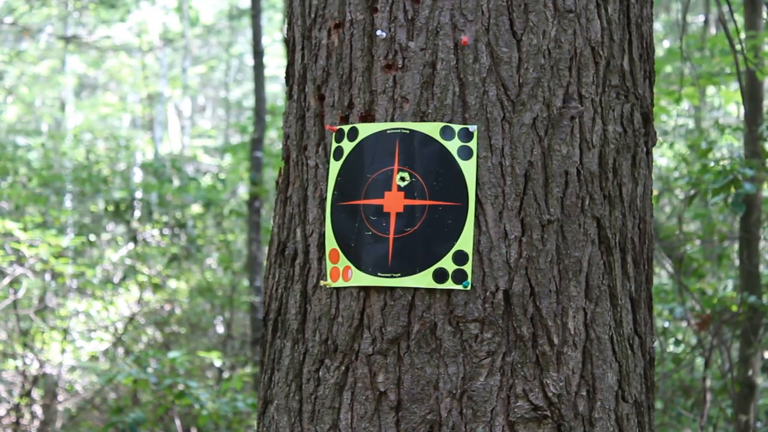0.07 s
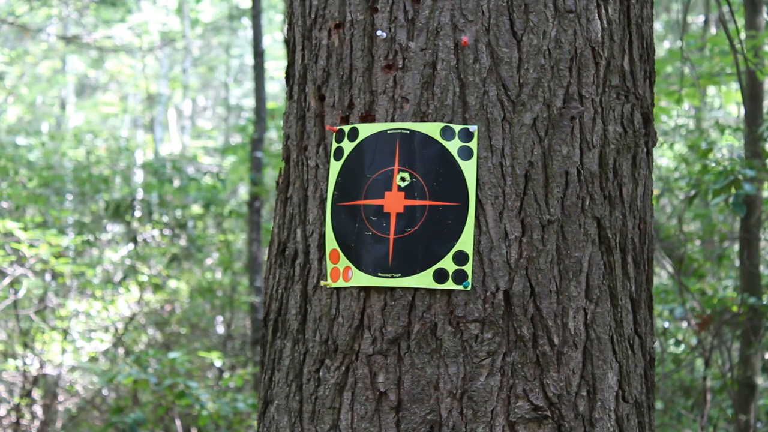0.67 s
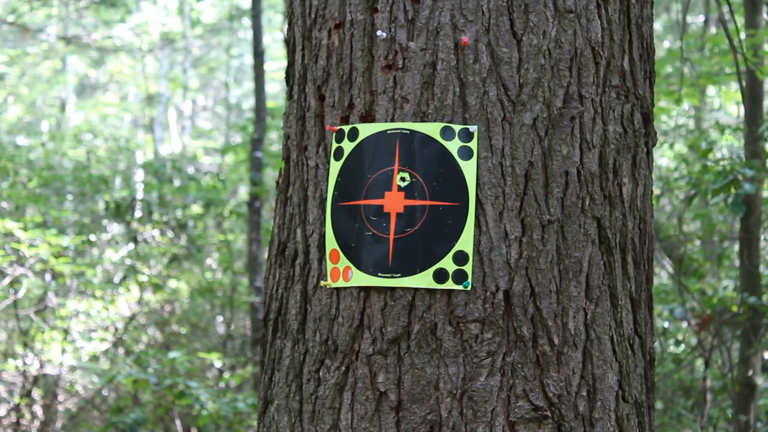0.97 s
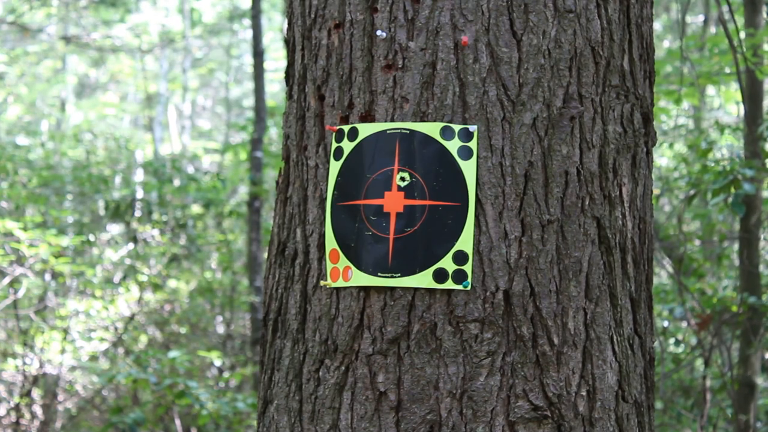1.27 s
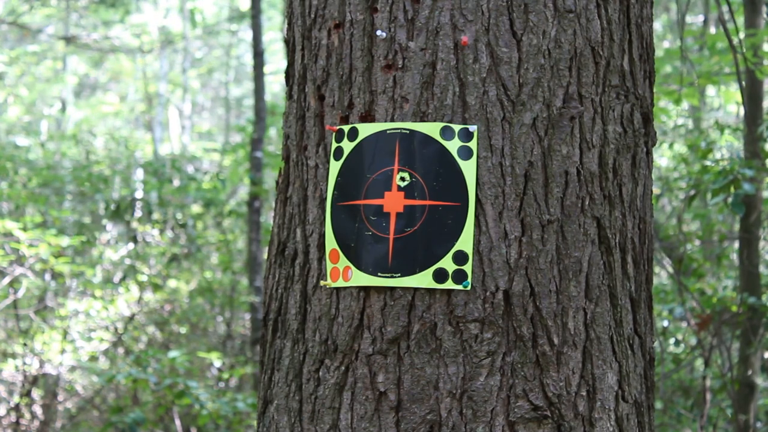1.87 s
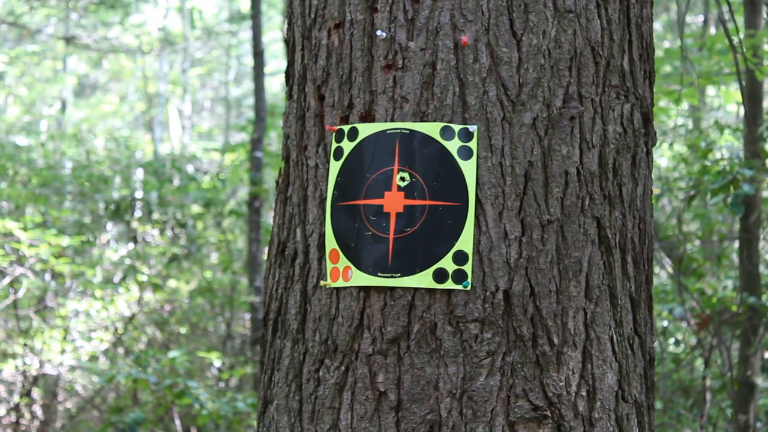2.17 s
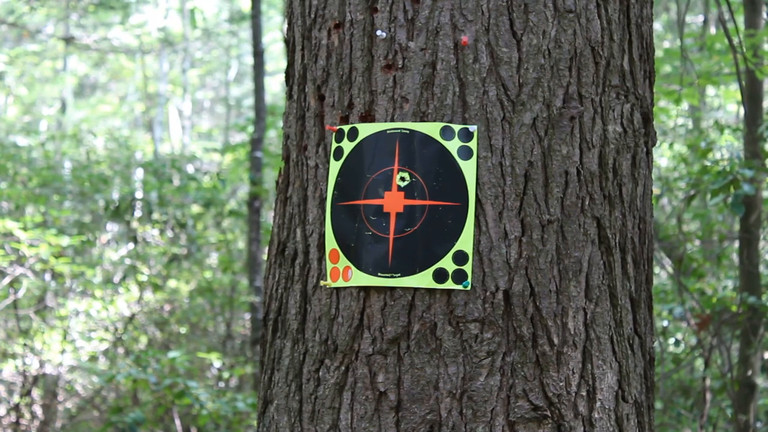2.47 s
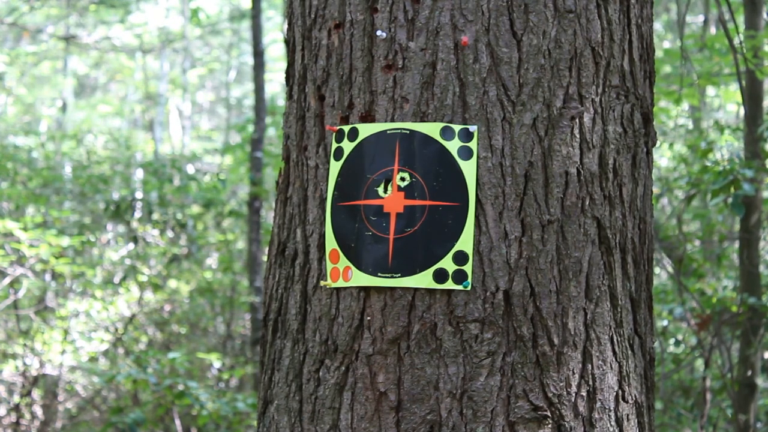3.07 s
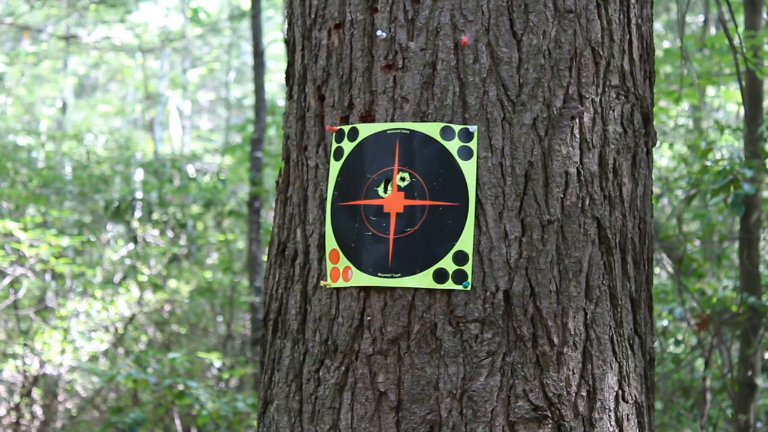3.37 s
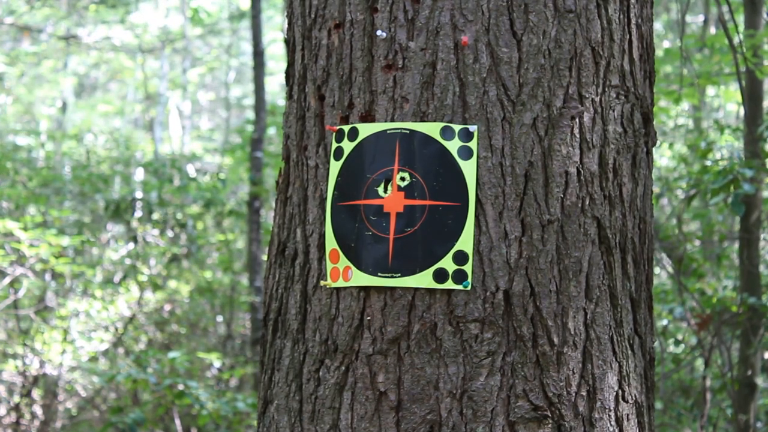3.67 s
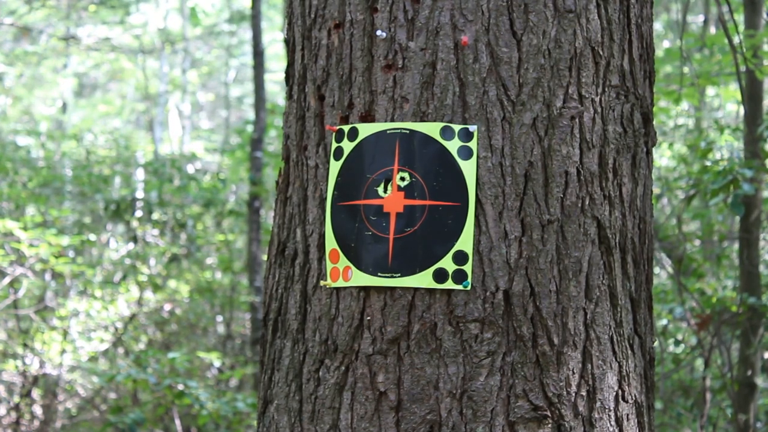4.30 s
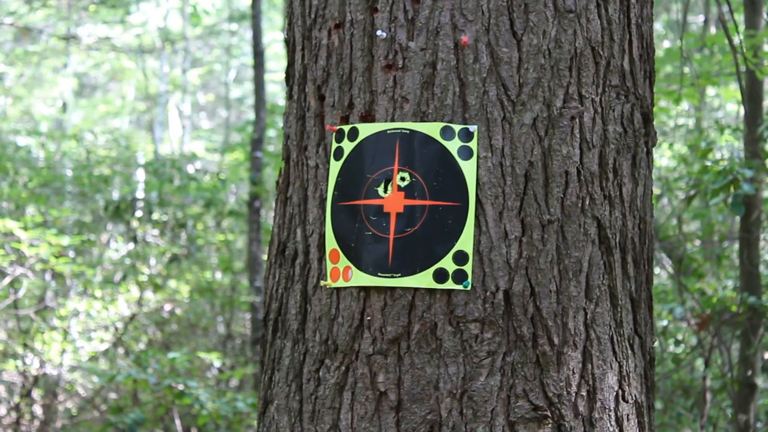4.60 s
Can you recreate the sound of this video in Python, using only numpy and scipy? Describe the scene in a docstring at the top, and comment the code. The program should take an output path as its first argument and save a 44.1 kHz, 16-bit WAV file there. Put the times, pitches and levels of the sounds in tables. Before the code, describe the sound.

For the first two seconds or so, the woods are quiet, with a faint hiss of foliage and soft, low puffs of breeze bumping the microphone. At about 2.4 seconds a flintlock pistol's flint strikes steel with a small ringing click and a very brief fizz of powder. At 2.5 seconds the pistol fires once, a loud, sharp blast with a low boom that overloads the microphone and makes the level dip. A long echo returns from the trees, swelling at around 2.9 seconds and then growing duller as it fades over the next second or more. Bits of bark tick brightly into dry leaves at about 3.3 seconds, and again very faintly near 3.7. At around 4.8 seconds a foot shifts with a soft, dull thud and a slight crinkle of leaf litter.

```python
"""A breeze stirs the woods and bumps the microphone. A flintlock pistol fires once: the flint strikes
and rings the steel, the priming fizzes, then the charge sends out a shock wave. The blast overloads the
microphone and ducks its gain control; trunks, ground and forest return a long echo that swells as the
gain recovers. Bits of bark tick into the leaves, and at last a foot shifts in the litter."""
import sys
import numpy as np
from scipy import signal
from scipy.fft import rfft, irfft, next_fast_len
from scipy.io import wavfile
from scipy.ndimage import uniform_filter1d, map_coordinates

SR = 44100
rng = np.random.default_rng(int(sys.argv[2]) if len(sys.argv) > 2 else 0)


def inscribe(sig):
    """Save sig as 16-bit PCM at rate SR to the path in sys.argv[1].

    A 1-D sig is mono; a 2-D sig holds one channel per row.
    Samples are clipped to [-1, 1] before scaling.
    """
    pcm = np.round(np.clip(np.atleast_2d(sig).T, -1, 1) * 32767)
    wavfile.write(sys.argv[1], SR, pcm.astype(np.int16))


N = 213655

# The blast and its strongest reflections. Each row: start in seconds, push level in dB,
# push length in seconds, roar level in dB, roar length in seconds. All levels are relative.
SHOCKS = [(2.4916, 24, .0017, 25, 0.00265), (2.4976, 6, 0.002, 11, 0.0045),
          (2.5059, 28.5, .0011, 27.5, 0.0021), (2.5143, 26, 0.0017, 33.5, .003)]
SHOT_S = SHOCKS[0][0]
# Roaring gas. Each row: frequency in Hz, level in dB.
GAS_SPECTRUM = [(40, 6), (300, 1.5), (800, 0), (2500, -8.5), (6000, -18.5), (12000, -23.5), (16000, -53)]
# Low rings. Each row: start in seconds, frequency in Hz, level in dB, 60 dB decay time in seconds.
RING_MODES = [(2.492, 327, 30.5, .016), (2.4923, 89.4, 11.5, .088)]

def blast():
    """Friedlander waves: each shock is a push, then a longer suction, with roaring gas; a ring near 330 Hz and
    a deeper one near 90 Hz sound with it."""
    gas, shocks = noise(GAS_SPECTRUM), np.zeros(N)
    for s, push_db, push_s, roar_db, roar_s in SHOCKS:
        age = since(s) / push_s
        push = amp(push_db) * (1 - age) * np.exp(-age)
        roar = amp(roar_db) * gas * np.exp(-(since(s) / roar_s) ** 4)
        shocks += (push + roar) * (clock() >= s)
    rings = sum(amp(db - 60 * since(s) / t60) * np.sin(2 * np.pi * hz * since(s))
               for s, hz, db, t60 in RING_MODES)
    return shocks + rings


# Flint meeting steel. Each row: start in seconds, level in dB.
CONTACTS = [(2.404, -7.5), (2.4071, -7.5), (2.4081, -8), (2.4109, -11.5), (2.417, -17), (2.4202, -20),
            (2.426, -17)]
# The lock's ring. Each row: frequency in Hz, level in dB, 60 dB decay time in seconds.
STEEL_MODES = [(1060, -4, .04), (1246, -4, 0.034), (2130, -8, .05), (2670, 0, 0.05), (3400, -9, 0.082),
               (4410, -7, 0.083), (5060, -2, 0.058), (8200, -12, .1), (9980, -9.5, .12)]
# Scraping flint. Each row: frequency in Hz, level in dB.
FLINT_SPECTRUM = [(150, -30), (450, -11), (750, -11), (1100, 3.5), (5000, 4), (7000, -6), (9500, 1),
                  (13000, -9), (16000, -20)]

def lock(crack_db, ring_db, crack_t60):
    """Impact excitation: each contact of the scraping flint cracks and rings the lock's damped modes."""
    t = np.arange(SR // 4) / SR
    ring = np.zeros(N)
    for s, db in CONTACTS:
        modes = sum(amp(level + rng.normal(0, 2) - 60 * t / t60)
                    * np.sin(2 * np.pi * (hz * t + rng.random())) for hz, level, t60 in STEEL_MODES)
        ring[round(s * SR):][:len(t)] += amp(db) * modes
    cracks = bursts(CONTACTS, crack_t60) * noise(FLINT_SPECTRUM)
    return amp(ring_db) * ring + amp(crack_db) * cracks


# Fizzing powder. Each row: frequency in Hz, level in dB.
POWDER_SPECTRUM = [(100, -14), (400, -7), (1000, -3), (1800, -3), (2700, 4), (3600, 0.5), (4500, 2.5),
                   (6500, -5), (8500, -1), (10000, -3), (11500, -8), (15500, -22)]

def priming(sputter_db):
    """Combustion noise: powder sputters in the pan, then jets from the touch hole as the charge fires."""
    flash = swell(2.412, db=-27.5, rise_db_per_s=2000, fall_db_per_s=118)
    jet = swell(SHOT_S, db=4, rise_db_per_s=10000, fall_db_per_s=7000)
    return (flash + jet) * noise(POWDER_SPECTRUM) * amp(sputter_db * wobble(400))


def trunks(first_per_s, added_per_s, fill_s, low_hz, high_hz, spread_db):
    """Early reflections: near trunks each return a thin spike, and more answer as the wave spreads."""
    def reflection(hz):
        bass_cut = (1j * hz / (low_hz / 2 + 1j * hz)) ** 2  # a trunk is too narrow to reflect bass
        return bass_cut / (1 + 1j * hz / high_hz) ** 2 / (1 + (hz / 11000) ** 6)  # bark dulls the top

    density = first_per_s + added_per_s * np.minimum(since(SHOCKS[-1][0]) / fill_s, 1) ** 2
    spikes = (rng.random(N) < density / SR) * amp(spread_db * rng.standard_normal(N))
    envelope = spreading(db=10.5, build_s=0.041, hold_s=0.059, db_per_doubling=16.5)
    return envelope * through_leaves(unit(filtered(spikes, reflection)))


# Far echoes. Each row: frequency in Hz, level in dB.
ECHO_SPECTRUM = [(30, -34), (90, -34.5), (170, -15), (250, -3.5), (350, 1), (450, -1), (620, -2.5),
                 (1300, -0.7), (2000, -2.4), (4000, -4), (6000, -7.5), (9000, -10.5), (13000, -25),
                 (16000, -44)]

def forest(clump_db, clumps_per_s):
    """Scattering: countless far echoes return in clumps, swelling as a thick stand of trees answers."""
    scatter = spreading(db=1.1, build_s=0.047, hold_s=0.46, db_per_doubling=14)
    stand = swell(2.935, db=-9, rise_db_per_s=240, fall_db_per_s=115)
    echoes = through_leaves(noise(ECHO_SPECTRUM))
    return (scatter + stand) * echoes * amp(clump_db * wobble(clumps_per_s))


def spreading(db, build_s, hold_s, db_per_doubling):
    """Spreading loss: echoes build, hold while crossing the trees, then fall as a power of their path."""
    travel = since(SHOT_S)
    doublings = np.log2(np.maximum(travel / hold_s, 1))
    return np.minimum(travel / build_s, 1) ** 2 * amp(db - db_per_doubling * doublings)


# Loss to air and leaves. Each row: frequency in Hz, loss in dB per second.
ABSORPTION = [(200, -0.5), (400, .7), (1000, 8.1), (2000, 15.4), (4000, 31), (7000, 46.5), (10000, 64.5),
              (15000, 90)]

def through_leaves(x):
    """Absorption: the longer an echo has travelled, the more treble air and leaves take."""
    hz, t, spectra = signal.stft(x, SR, nperseg=512)
    loss_db = along(ABSORPTION, hz)[:, None] * np.maximum(t - SHOT_S, 0)
    return signal.istft(spectra * amp(-loss_db), SR, nperseg=512)[1][:N]


# A near and a far roll of bass. Each row: peak time in seconds, level in dB.
BASS_SWELLS = [(2.52, -9), (2.9, -29)]
# Their colour. Each row: frequency in Hz, level in dB.
BASS_SPECTRUM = [(15, -16), (40, -7), (80, -2), (130, -6), (220, -10), (600, -50), (2000, -120)]

def ground_roll():
    """Ground wave: the bass of the shot comes back along the ground in swells."""
    rolls = sum(swell(s, db, rise_db_per_s=130, fall_db_per_s=145) for s, db in BASS_SWELLS)
    return rolls * (clock() >= SHOT_S) * noise(BASS_SPECTRUM)


# Bark landing. Each row: start in seconds, level in dB.
BARK_HITS = [(3.2455, -14), (3.323, -23), (3.326, -28), (3.69, -42), (3.709, -39)]
# Its tick. Each row: frequency in Hz, level in dB.
TICK_SPECTRUM = [(1500, -35), (3500, -14), (5600, 7), (6800, -1), (8000, -8), (10000, -7), (12000, -18),
                 (15500, -35)]

def falling_bark(db, t60):
    """Light impacts: each chip strikes dry leaves with a brief, bright tick."""
    return amp(db) * bursts(BARK_HITS, t60) * noise(TICK_SPECTRUM)


# Heel and sole. Each row: start in seconds, level in dB.
FOOT_HITS = [(4.763, -29.5), (4.783, -34)]
# Trodden soil. Each row: frequency in Hz, level in dB.
SOIL_SPECTRUM = [(40, -10), (300, -1), (1000, -5), (4000, -12.5), (7000, -21), (14000, -46)]

def footstep(db, t60):
    """Cushioned impact: heel and sole meet the soil with a dull, rounded thud."""
    return amp(db) * uniform_filter1d(bursts(FOOT_HITS, t60), size=64) * noise(SOIL_SPECTRUM)


# Leaves stirring. Each row: peak time in seconds, level in dB.
LEAF_SWELLS = [(3.49, -53), (3.69, -53), (4.84, -41.5)]
# Their crinkle. Each row: frequency in Hz, level in dB.
LEAF_SPECTRUM = [(300, -5), (1500, 4.5), (5000, -3), (9000, -2), (12000, -11), (15500, -27)]

def leaf_litter(crinkle_db):
    """Amplitude modulation: fast flutter in a noise is heard as dry leaves crinkling."""
    crinkle = unit(noise(LEAF_SPECTRUM) * amp(crinkle_db * wobble(500)))
    return crinkle * sum(swell(s, db, rise_db_per_s=190, fall_db_per_s=110) for s, db in LEAF_SWELLS)


# Foliage all around. Each row: frequency in Hz, level in dB.
HUSH_SPECTRUM = [(20, -25), (45, -13.5), (90, -11.5), (170, -12.5), (310, -11), (650, -15.5), (1500, -18),
                 (2900, -16.5), (4500, -19), (8800, -29), (12200, -41.5), (15500, -56)]
# Air over the microphone. Each row: frequency in Hz, level in dB.
DRAUGHT_SPECTRUM = [(12, -20), (25, -2.5), (45, -1), (85, -11.5), (200, -37), (800, -120)]
# Puffs of air. Each row: centre in seconds, level in dB, half period in seconds.
EDDIES = [(0.361, -42, .02), (0.56, -40.5, 0.015), (0.603, -38, 0.012), (0.813, -42, .03),
          (1.17, -37, 0.013), (1.322, -42, 0.009), (1.41, -39, 0.014), (1.52, -41, .018),
          (2.031, -30, 0.0072), (2.233, -37, 0.01)]

def breeze(puff_db, waver_db, gust_db, lull_s, lull_db_per_s):
    """Turbulence: foliage hisses, a draught gusts and dies down, eddies pull and push the microphone."""
    hush = amp(-44.5 + waver_db * wobble(5.06)) * noise(HUSH_SPECTRUM)
    gusts = unit(noise(DRAUGHT_SPECTRUM) * amp(gust_db * wobble(12)))
    draught = amp(-55.5 - lull_db_per_s * since(lull_s)) * gusts
    eddies = np.zeros(N)
    for s, db, half_period in EDDIES:
        age = (clock() - s) / half_period
        eddies += amp(db) * np.sin(np.pi * age) * np.exp(-age ** 2)
    return hush + draught + amp(puff_db) * eddies


def gain_control(x, limit_db, depth_db, attack_s, release_db_per_s, linger_db):
    """Compression: peaks over the limit duck the gain; it creeps back steadily but stays a little low."""
    excess = np.clip(20 * np.log10(np.abs(x) + 1e-9) - limit_db, 0, depth_db)
    creep = release_db_per_s * clock()
    lingering = np.minimum(np.maximum.accumulate(excess), linger_db)
    held = np.maximum(np.maximum.accumulate(excess + creep) - creep, lingering)
    pole = np.exp(-1 / (attack_s * SR))
    return x * amp(-signal.lfilter([1 - pole], [1, -pole], held))


def amp(db):
    """Decibels to gain."""
    return 10 ** (np.asarray(db) / 20)


def unit(x):
    """Scale to rms 1."""
    return x / np.sqrt(np.mean(x ** 2) + 1e-20)


def clock():
    """Time of every sample."""
    return np.arange(N) / SR


def since(s):
    """Time passed since s, zero before it."""
    return np.maximum(clock() - s, 0)


def along(points, hz):
    """Interpolation on a log frequency axis."""
    knots_hz, values = np.transpose(points)
    return np.interp(np.log(hz + 1), np.log(knots_hz + 1), values)


def wobble(rate):
    """A smooth random curve, rate knots a second."""
    return map_coordinates(rng.standard_normal(int(N * rate / SR) + 4), [clock() * rate])


def filtered(x, response):
    """The spectrum of x times a frequency response."""
    size = next_fast_len(N + SR // 2)
    return irfft(rfft(x, size) * response(np.fft.rfftfreq(size, 1 / SR)), size)[:N]


def noise(spectrum):
    """Coloured noise of rms 1."""
    return unit(filtered(rng.standard_normal(N), lambda hz: amp(along(spectrum, hz))))


def bursts(rows, t60):
    """Exponential decay after each sudden hit."""
    return sum(amp(db - 60 * since(s) / t60) * (clock() >= s) for s, db in rows)


def swell(s, db, rise_db_per_s, fall_db_per_s):
    """Exponential rise to a peak at s, then decay."""
    return amp(db - rise_db_per_s * np.maximum(s - clock(), 0) - fall_db_per_s * since(s))


def scene():
    """Superposition: lock, flash, shot and echoes add to the quiet of the woods."""
    pistol = lock(crack_db=-7.5, ring_db=-20.5, crack_t60=0.007) + priming(sputter_db=1) + blast()
    near = trunks(first_per_s=1300, added_per_s=10000, fill_s=0.04, low_hz=256, high_hz=6200, spread_db=4)
    far = forest(clump_db=0.93, clumps_per_s=60) + ground_roll()
    floor = falling_bark(db=-5.5, t60=0.011) + footstep(db=-5, t60=0.088) + leaf_litter(crinkle_db=3)
    air = breeze(puff_db=-1, waver_db=0.23, gust_db=3, lull_s=2.3, lull_db_per_s=4.8)
    return (pistol + near + far + floor + air)[None]


def record(dry):
    """Overload: the gain ducks too late, so the blast clips; a steep low-pass trims the top."""
    ducked = gain_control(dry[0], limit_db=6, depth_db=26, attack_s=0.02,
                          release_db_per_s=28.5, linger_db=2)
    clipped = np.clip(ducked, -1, 1)
    return filtered(clipped, lambda hz: 1 / np.sqrt(1 + (hz / 15900) ** 60))[None]


dry = scene()
out = record(dry)
inscribe(out)
```